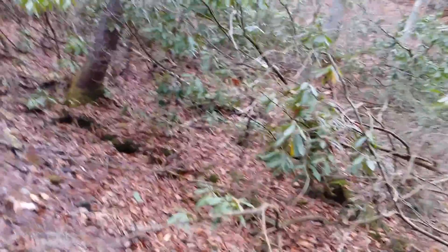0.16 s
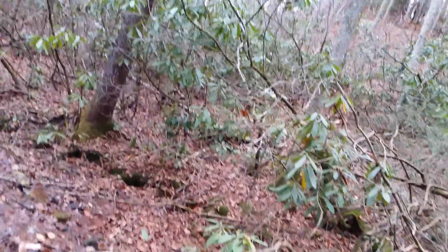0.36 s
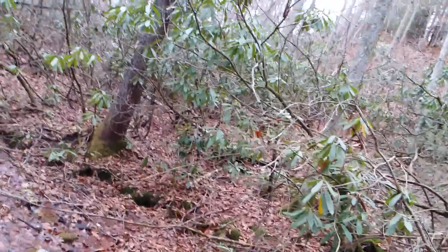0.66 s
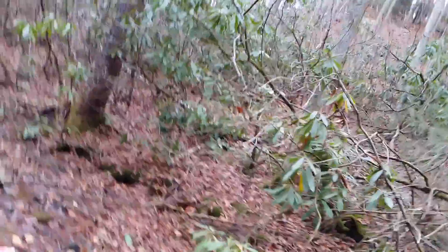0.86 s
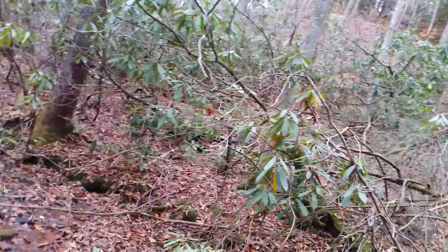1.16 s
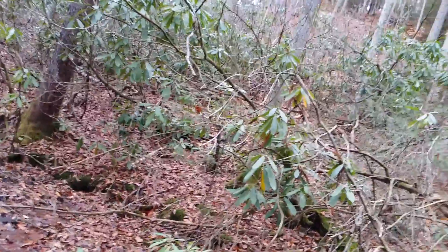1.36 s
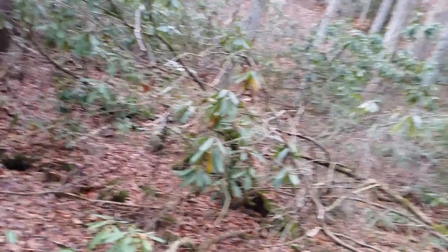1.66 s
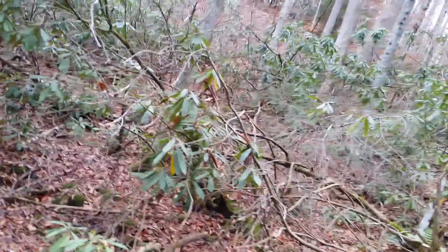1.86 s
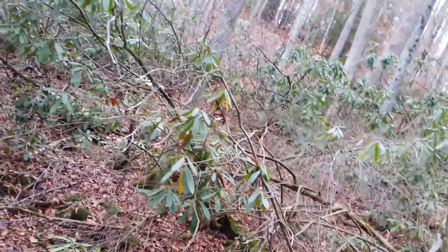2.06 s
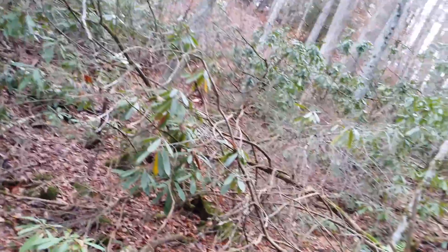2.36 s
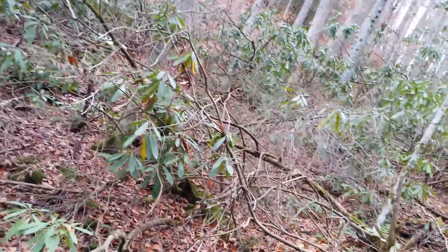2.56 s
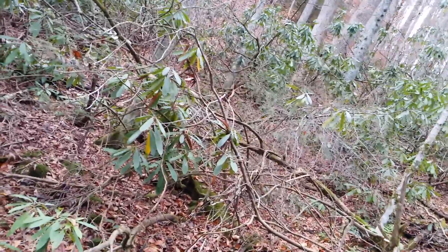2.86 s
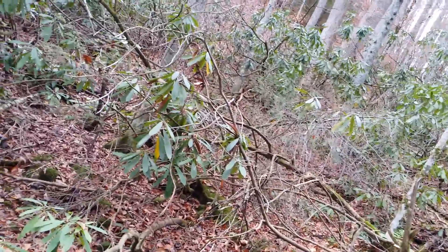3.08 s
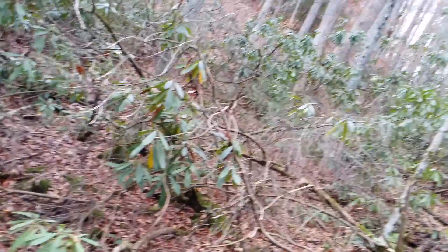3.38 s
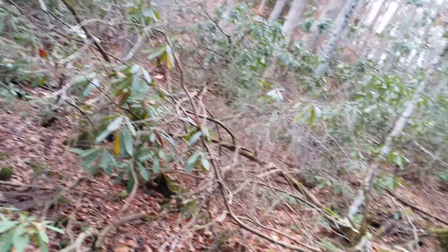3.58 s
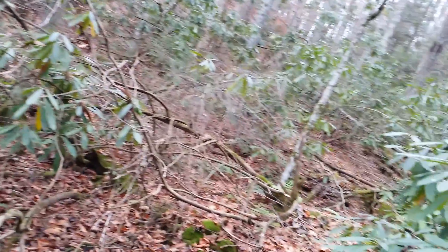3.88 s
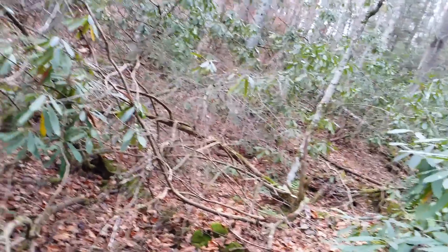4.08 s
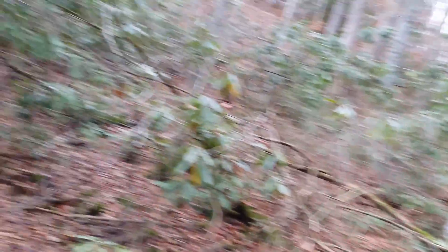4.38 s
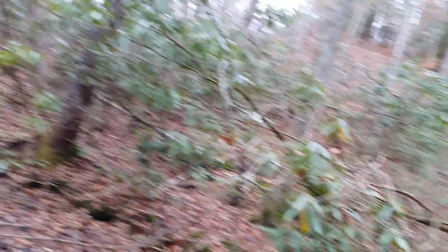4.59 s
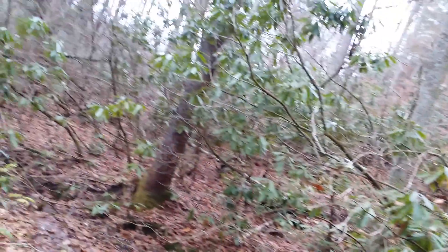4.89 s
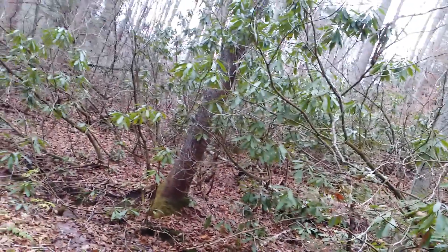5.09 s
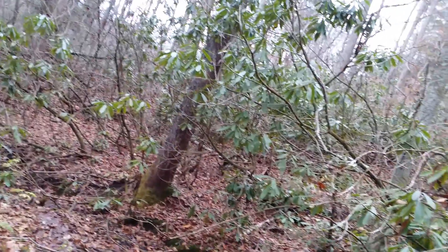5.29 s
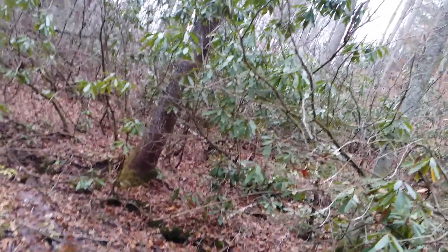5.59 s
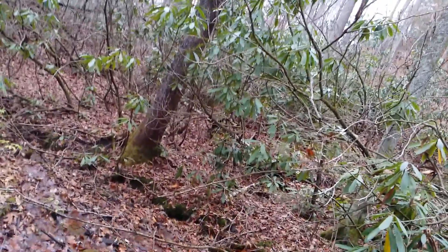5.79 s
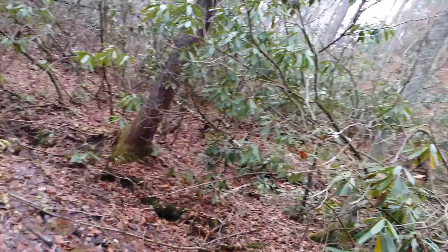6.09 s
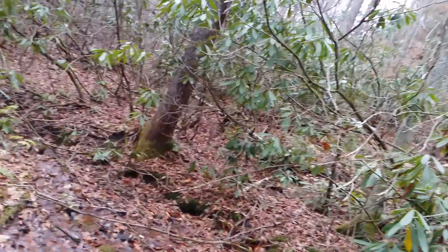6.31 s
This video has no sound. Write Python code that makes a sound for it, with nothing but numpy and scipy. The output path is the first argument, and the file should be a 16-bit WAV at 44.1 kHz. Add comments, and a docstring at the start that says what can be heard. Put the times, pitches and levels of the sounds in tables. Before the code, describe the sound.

Someone treads through dry leaves and dead branches in a forest. A loud cluster of cracks opens, followed by crunching and scattered twig snaps. The movement quiets, one hard crack stands alone, then a last group of sharp breaks comes with renewed rustling. The hand-held stereo microphone is close, adding low rumble and faint steady hiss; each snap leaves a short woody wash from the trees.

```python
"""Someone picks a way over a forest floor: leaves crunch under each press of a foot, and twigs and sticks snap.
A cluster of snaps opens the scene, more follow until 2.4 s, a lone loud one comes at 3.3 s and a last group after 4.7 s.
Each snap is a brittle fracture coloured by the stick's bending modes, then scattered by the litter and nearby trunks.
Low noise rumbles and leaves rustle as the walker moves the hand-held microphone, most in the first second and
after 5.5 s; small stalks tick, footfalls thud softly, and a faint steady noise is the microphone's hiss."""
import sys
import numpy as np
from scipy import signal
from scipy.fft import rfft, irfft, next_fast_len
from scipy.io import wavfile
from scipy.ndimage import uniform_filter1d, map_coordinates

SR = 44100
rng = np.random.default_rng(int(sys.argv[2]) if len(sys.argv) > 2 else 0)


def log_audio(samples):
    """Write samples as a 16-bit WAV file to the path given in sys.argv[1]."""
    # one column per channel
    frames = np.atleast_2d(samples).T
    # limit to full scale, then quantise
    limited = np.clip(frames, -1, 1)
    pcm = np.round(limited * 32767).astype(np.int16)
    wavfile.write(sys.argv[1], SR, pcm)


N = 284451

# spectrum of the hiss: frequency_hz, relative_density_db
HISS_SPECTRUM = [(290, -18), (500, -1), (750, -3.5), (1200, -7.5), (2000, -10), (3500, -9), (5400, -12.5),
                 (6600, 1.5), (7500, 2), (9500, -5.5), (12300, -13), (15000, -10.5), (16000, -12.5)]
# likeness of the hiss in the two ears: frequency_hz, coherence
HISS_COHERENCE = [(300, 0.041), (650, 0.077), (1400, 0)]
# stereo balance of the hiss: frequency_hz, left_over_right_db
HISS_BALANCE = [(1500, -1), (4400, 2.5), (6000, 7), (8000, 10), (11000, 7), (15000, 3)]

# three humps of the rumble, from the lowest up: frequency_hz, relative_density_db
DEEP_SPECTRUM = [(20, -50), (35, -30), (50, -5.5), (75, -2.5), (95, 8), (125, -23), (200, -68)]
BOOM_SPECTRUM = [(60, -50), (90, -14), (120, 2), (160, 1.5), (200, -3), (250, -13), (400, -50.5)]
HOLLOW_SPECTRUM = [(140, -50), (220, 5), (265, -6.5), (315, 5), (370, -7), (460, -10), (600, -23),
                   (1000, -29), (2000, -67)]
# how briskly the walker moves, as a rumble level against STILL_DB: time_s, level_db
MOTION_LEVEL = [(0.0, -48), (0.34, -41), (0.54, -44.5), (0.74, -45.5), (1.0, -55.5), (2.57, -60),
                (3.38, -53.5), (3.56, -51.5), (3.77, -56.5), (4.29, -55.5), (4.69, -54.5), (4.99, -52.5),
                (5.59, -42.5), (5.8, -44.5), (6.0, -46.5), (6.45, -48)]
STILL_DB = -58  # the level when the walker stands almost still
# the upper hump, before a small common lift: time_s, level_db
HOLLOW_LEVEL_CURVE = [(0.0, -58.5), (0.49, -50), (2.3, -62), (2.86, -63), (3.25, -59), (4.46, -58),
                      (4.71, -53), (5.15, -55.5), (5.5, -49.5), (5.87, -54.5), (6.2, -48.5), (6.45, -52)]
# extra surges of the lowest hump: centre_s, level_db
DEEP_SURGES = [(.78, -51), (4.6, -59), (5.04, -48), (5.2, -55), (5.53, -52), (6.39, -56)]
SURGE_S = 0.089  # from the centre of a surge to 1/e of its peak

# soft footfalls and dull knocks of wood, level before the onset is shaped: start_s, level_db, pitch_hz, t60_s
FOOTFALLS = [(.024, -16, 340, 0.015), (.747, -50, 73.6, .29), (5.03, -52, 70.6, .15),
             (5.471, -29.5, 647, 0.02), (5.789, -37, 152, 0.14)]

# a foot presses or brushes the leaves, crispness before a common cut:
# start_s, hold_s, crush_level_db, crisp_over_crush_db
FOOT_PRESSES = [(0, 0.018, -42, 8.5), (0.068, 0.058, -47.5, 1.5), (0.178, 0.031, -47, 4),
                (0.38, 0.23, -55, 1.5), (0.709, 0.014, -41.5, 12), (0.803, 0.36, -50.5, 4),
                (1.21, 0.15, -50, 6.5), (1.672, 0.038, -49, 6.5), (1.792, 0.036, -48.5, 10.5),
                (1.894, 0.1, -56.5, 6), (2.22, 0.14, -62.5, -11), (2.743, 0.065, -69, 10.5),
                (3.41, 0.17, -63, 3), (5.645, .06, -61.5, -7), (6.018, 0.07, -46.5, -0.5),
                (6.15, 0.25, -54, 4)]
ATTACK_S, RELEASE_S = 0.023, 0.04  # the crunch grows and dies by a factor e in these times
# spectra of the dull crunch and the crisp crackle: frequency_hz, relative_density_db
CRUSH_SPECTRUM = [(150, -18), (350, -5), (700, 2.5), (1300, 0.5), (2200, -4), (3200, -4), (5000, -1.5),
                  (9000, -30)]
CRISP_SPECTRUM = [(1200, -11), (2500, 2.5), (3600, -2.5), (4700, 4), (6000, 3), (7800, -0.5), (10000, -1.5),
                  (13000, -6.5), (16000, -4.5)]
# likeness of the leaves in the two ears: frequency_hz, coherence
LEAF_COHERENCE = [(300, 0.27), (650, 0.56), (1400, 0.026), (3000, -0.089), (7000, -0.047)]
# stalks that tick clearly, level before a common lift: start_s, level_db, pitch_hz
STALK_TICKS = [(.621, -46, 1027), (.766, -43, 1530), (0.809, -38, 4000), (1.324, -29.5, 4680),
               (2.004, -43, 3880), (2.574, -51, 3000), (2.623, -46, 4650), (2.731, -47, 5250),
               (2.983, -54, 2950), (3.125, -49, 2320), (3.222, -52, 2770), (3.428, -48, 2440),
               (3.495, -49.5, 1240), (3.57, -48, 3960), (4.427, -49, 4370), (5.532, -45.5, 1760),
               (6.108, -30.5, 4820), (6.355, -38, 4230)]

# breaking twigs, except the row at 5.4204, a strong quick return of the snap just before it off nearby litter
# and trunks: start_s, level_db, brightness_db_per_octave, lowest_bending_mode_hz, ring_db, tearing (0 to 1),
# left_over_right_db
STICK_SNAPS = [(0.023, -3, -5.5, 5330, 16, 0.54, 1), (.0636, -23, 4, 3500, 4, 0.2, -1),
               (0.0742, -13.5, -2.5, 7700, 11.5, 1, -3), (.111, -7, -0.5, 4320, 2.5, .86, 6),
               (.118, -15.5, -2, 800, 8, 0.85, -2), (0.9249, -19, -2.2, 1780, 11, 0.7, 5),
               (.993, -12, -2, 487, 7, 0.38, 0), (1.1179, -15, -5.5, 5640, 19.5, 0.6, 5),
               (1.2434, -24, -4.5, 1360, 20, 0, 2), (1.4428, -0.5, -0.9, 2800, 14, .26, 1.5),
               (1.7041, -22, -3, 3400, 17.5, 0.64, 0), (1.7848, -11.5, -1.1, 1490, 8.5, 0.34, 2),
               (1.8101, -16.5, -4, 2220, 20.5, 0.64, 3), (1.8647, -16, -2, 2410, 19, 0.68, 2),
               (1.871, -22, -2.5, 2420, 21.5, 0.1, 7), (1.919, -25.5, -3, 3800, 22, 0.95, 5),
               (1.9536, -13, 1.5, 1090, 14, 0.3, 4), (2.205, -19.5, -3, 830, 8, 0.25, 1),
               (2.4242, -16, -3.5, 745, 13.5, 0.33, 4), (3.2973, 2.5, 0.8, 980, 3, 0.49, 8),
               (4.7078, -26, -3, 1550, 15, .5, 3), (4.7725, -22, -3, 1550, 14.5, .16, 1.5),
               (5.0827, -30, -5.5, 433, 9.5, 0.33, 0), (5.4173, -1, -0.5, 1360, 8.5, 0.04, 5),
               (5.4204, -7, 2.5, 990, 4.5, 0.77, -9), (5.4707, -2, -0.8, 590, -0.5, 0.68, 1.5),
               (5.837, -15.5, -1.8, 1330, 11, 0.5, 5)]
# bending modes of a stick: multiple_of_lowest_mode, share_of_ring
BENDING_MODES = [(1, 1), (2.76, 0.7), (5.4, 0.49)]
MODE_OCTAVES = 0.54  # Gaussian width of a mode: dead wood is heavily damped
TRAVEL_S = .0005  # time that a bending wave of 1 kHz takes along a stick
# colour that all sticks share: frequency_hz, gain_db
WOOD_COLOUR = [(60, -26), (200, -5.5), (350, 0.5), (800, 2.5), (2000, -2), (5000, 0), (7600, -1),
               (10500, -1), (15000, -3)]
# where the snaps lie as the microphone turns: time_s, left_ear_lead_ms
SNAP_BEARING = [(0, 0.23), (1.2, 0.2), (1.44, 0.04), (1.7, 0.26), (3.3, 0.18), (4.7, -0.29), (5.42, -0.055),
                (5.5, 0.1)]
# early decay of the forest's wash: frequency_hz, t60_s
FOREST_DECAY = [(300, 0.063), (2000, 0.069), (8000, .15), (16000, 0.16)]
# colour of the wash: frequency_hz, gain_db
SCATTER_COLOUR = [(200, 4), (1000, 2), (3000, 1.5), (6000, 1), (12000, 0.5)]

# the microphone's colour, on leaves, ticks and snaps: frequency_hz, gain_db
MICROPHONE_COLOUR = [(400, 3.5), (750, -1.5), (1400, 1), (1900, 0), (2500, -1), (3300, -0.5), (4700, -4),
                     (5900, -3), (7600, 4), (9800, 0.5), (13000, 1), (15500, -2.5)]
TOP_HZ = 15800  # band limit


def amp(db):
    """Logarithmic level: 20 dB is a tenfold amplitude."""
    return 10 ** (np.asarray(db) / 20)


def unit(x):
    """Normalisation to a root-mean-square of 1."""
    return x / np.sqrt(np.mean(x ** 2) + 1e-20)


def along(points, hz):
    """Linear interpolation of (frequency, value) points on a logarithmic frequency axis."""
    point_hz, values = np.transpose(points)
    return np.interp(np.log(hz + 1), np.log(point_hz), values)


def curve(rows):
    """Linear interpolation of (time, value) rows at every sample."""
    times, values = np.transpose(rows)
    return np.interp(np.arange(N) / SR, times, values)


def wobble(rate):
    """Random modulation: a smooth curve through `rate` random knots a second."""
    knots = rng.standard_normal(int(N * rate / SR) + 4)
    return map_coordinates(knots, [np.arange(N) * rate / SR])


def filtered(x, response):
    """Linear filtering: the spectrum times a response of frequency."""
    length = x.shape[-1]
    padded = next_fast_len(length + 8192)
    spectrum = rfft(x, padded) * response(np.fft.rfftfreq(padded, 1 / SR))
    return irfft(spectrum, padded)[..., :length]


def panned(left_over_right_db):
    """Interaural level difference: left and right gains of mean power 1."""
    gains = amp(np.array([[.5], [-.5]]) * left_over_right_db)
    return gains / np.sqrt(np.mean(gains ** 2, axis=0))


def spread(pair, spectrum, coherence):
    """Interaural coherence: two unrelated signals, coloured and blended as mid and side, give stereo of rms 1."""
    def mid_side_gains(hz):
        angle = np.arccos(np.clip(along(coherence, hz), -1, 1)) / 2
        return amp(along(spectrum, hz)) * [np.cos(angle), np.sin(angle)]

    mid, side = filtered(pair, mid_side_gains)
    return unit(np.array([mid + side, mid - side]))


def add(track, start_s, sound):
    """Superposition: mix a sound into the track from its start time."""
    i = max(0, round(start_s * SR))
    track[:, i:i + sound.shape[-1]] += sound[..., :N - i]


def patchy(depth_db, size):
    """Fluctuating noise: pitch bands swell and fade apart; a small window gives quick, wide patches."""
    noise = signal.stft(rng.standard_normal((2, N)), nperseg=size)[2]
    field = rng.standard_normal(noise.shape[1:])
    for axis in (0, 1):
        field = uniform_filter1d(field, size=3, axis=axis)
    patches = noise * amp(depth_db * unit(field))
    return unit(signal.istft(patches, nperseg=size)[1][:, :N])


def air():
    """Stationary noise: a steady hiss whose treble leans to the left."""
    hiss = spread(rng.standard_normal((2, N)), HISS_SPECTRUM, HISS_COHERENCE)
    return amp(-58.5) * filtered(hiss, lambda hz: panned(along(HISS_BALANCE, hz)))


def motion():
    """Motion as a control signal: its level above standing still, in dB."""
    return curve(MOTION_LEVEL) - STILL_DB


def rumble(deep_db=-69, deep_follow=0.89, boom_db=-54.5, hollow_db=1):
    """Band-shaped noise: three humps, almost alike in both ears; the lower two follow the movement."""
    def hump(spectrum, coherence):
        return spread(patchy(depth_db=1.7, size=4096), spectrum, [(100, coherence)])

    t = np.arange(N) / SR
    moving_db = motion()
    deep = amp(deep_db + deep_follow * moving_db)
    for centre_s, db in DEEP_SURGES:
        deep = deep + amp(db) * np.exp(-((t - centre_s) / SURGE_S) ** 2)
    boom = amp(boom_db + moving_db)
    hollow = amp(hollow_db + curve(HOLLOW_LEVEL_CURVE))
    return deep * hump(DEEP_SPECTRUM, 0.88) + boom * hump(BOOM_SPECTRUM, 0.97) + hollow * hump(HOLLOW_SPECTRUM, 0.9)


def thuds():
    """Damped oscillation: the foot's weight gives the soil or a buried branch a short, low push."""
    out = np.zeros((2, N))
    t = np.arange(SR // 3) / SR
    for start_s, db, hz, t60 in FOOTFALLS:
        onset = (1 - np.exp(-2 * hz * t)) ** 2
        add(out, start_s, 2 * amp(db - 60 * t / t60) * np.sin(2 * np.pi * hz * t) * onset)
    return out


def leaf_levels(rest_crush_db=-70.0, rest_crisp_db=-61.0, follow=0.41):
    """Addition of powers: each press swells, holds and dies over a rustle that follows the movement."""
    t = np.arange(N) / SR
    stir_db = follow * motion()
    crush_power = amp(rest_crush_db + stir_db) ** 2
    crisp_power = amp(rest_crisp_db + stir_db) ** 2
    for start_s, hold_s, db, crispness_db in FOOT_PRESSES:
        growth = (t - start_s) / ATTACK_S
        decay = (start_s + hold_s - t) / RELEASE_S
        press = np.exp(np.minimum(0, np.minimum(growth, decay)))
        crush_power = crush_power + (amp(db) * press) ** 2
        crisp_power = crisp_power + (amp(db + crispness_db) * press) ** 2
    return 10 * np.log10(crush_power), 10 * np.log10(crisp_power)


def crackle(rate, size_db, rub):
    """Random impulses: `rate` leaf fractures a second, of uneven size, over the patchy noise of rubbing."""
    sizes = amp(size_db * np.minimum(rng.exponential(size=(2, N)), 4))
    struck = rng.random((2, N)) < rate / SR
    breaks = struck * sizes * rng.choice([-1, 1], (2, N))
    return unit(breaks) + rub * patchy(depth_db=2.8, size=256)


def leaves(crush_db, crisp_db):
    """Crackling noise: crushed litter crunches dully, its brittle edges crackle; both come in clumps."""
    clumps_db = 1.2 * wobble(70)
    crush = spread(crackle(rate=900, size_db=3.5, rub=1.3), CRUSH_SPECTRUM, LEAF_COHERENCE)
    crisp = spread(crackle(rate=3000, size_db=3.3, rub=1.4), CRISP_SPECTRUM, LEAF_COHERENCE)
    return panned(1.95) * (amp(crush_db + clumps_db) * crush + amp(crisp_db + clumps_db - 3.0) * crisp)


def tick(hz, cycles):
    """Damped resonance with phase noise: a small stiff bit flicks and scrapes, falling 60 dB in `cycles`."""
    t = np.arange(SR // 40) / SR
    drift = np.cumsum(rng.standard_normal((2, len(t))), axis=1) * np.sqrt(hz / SR) * 0.98
    ring = np.sin(2 * np.pi * hz * t + rng.uniform(0, 2 * np.pi) + drift)
    scrape = 0.16 * rng.standard_normal((2, len(t))) * amp(-60 * t / .01)
    return (ring + scrape) * amp(-60 * t * hz / cycles) * (1 - np.exp(-t * hz))


def stalk_ticks():
    """Isolated resonances: single stalks tick clearly now and then."""
    out = np.zeros((2, N))
    for start_s, db, hz in STALK_TICKS:
        add(out, start_s, amp(db + 3) * panned(2.2) * tick(hz, cycles=74))
    return out


def loose_flicks(crush_db, scatter_db, loose_db, stray_db, count):
    """Random excitation: the harder the litter is crushed, the louder its loose bits flick; a few stand out."""
    out = np.zeros((2, N))
    starts = rng.integers(N, size=count)
    for i, (size, pitch, side) in zip(starts, rng.standard_normal((count, 3))):
        db = crush_db[i] + loose_db + scatter_db * min(size, 2) + stray_db * (size > 1.6)
        hz = min(2000 * np.exp(.5 * pitch), 8000)
        add(out, i / SR, amp(db) * panned(2 + 4 * side) * tick(hz, cycles=31))
    return out


def causal(log_gain):
    """Minimum phase: the quickest response with this log gain, on the grid of a real FFT."""
    cepstrum = irfft(log_gain)
    half = len(log_gain) - 1
    folded = np.r_[cepstrum[0], 2 * cepstrum[1:half], cepstrum[half], np.zeros(half - 1)]
    return np.exp(rfft(folded))


def stick_colour(stick, hz):
    """Modal colour in dB: wood, tilted by brightness about 2 kHz, with a broad hump at each bending mode."""
    db, brightness, lowest_hz, ring_db = stick
    octaves = np.log2(np.maximum(hz, 200) / 2000)  # the tilt stops below 200 Hz
    modes = 0
    for multiple, share in BENDING_MODES:
        distance = np.log2((hz + 1) / (multiple * lowest_hz))  # octaves
        modes = modes + share * np.exp(-.5 * (distance / MODE_OCTAVES) ** 2)
    return db + along(WOOD_COLOUR, hz) + brightness * octaves + ring_db * modes


def fracture(stick, tear, tear_t60, recoil, recoil_t60):
    """Brittle and fibrous fracture: one click or a tearing of fibres, then a duller rattle as the ends recoil."""
    t = np.arange(2 ** 11) / SR
    hz = np.fft.rfftfreq(len(t), 1 / SR)
    tear = np.clip(tear, .1, 1)
    fibres, ends = rng.standard_normal((2, len(t)))
    fibres *= amp(-60 * t / (tear * tear_t60))  # more tearing also lasts longer
    dulling = signal.butter(2, 2500, fs=SR, output='sos')
    ends = signal.sosfilt(dulling, ends) * amp(-60 * t / recoil_t60)
    click = t == 0
    push = rfft((1 - tear) * click + tear * fibres / np.linalg.norm(fibres) + recoil * ends)
    # dead wood has no clear note: even out the broad chance peaks, then give the stick's own colour
    power = abs(uniform_filter1d(abs(push) ** 2, size=30)) + .02
    return irfft(push * causal(np.log(amp(stick_colour(stick, hz)) / np.sqrt(power))))


def dispersion(hz):
    """Dispersion: bending waves run faster the higher they are, so a crack's treble leaves the stick first."""
    return np.exp(-4j * np.pi * TRAVEL_S * np.sqrt(hz * 1000))


def interaural_delay(lead_ms, hz):
    """Interaural time difference: the farther ear hears the snap later."""
    twice_delay_ms = abs(lead_ms) + np.array([[-1], [1]]) * lead_ms
    return np.exp(-1j * np.pi * hz * twice_delay_ms / 1000)


def forest(stick, wet_db, late_db, late_t60):
    """Diffuse scattering: litter and trunks return a grainy wash; farther trees add a faint longer tail."""
    hz, t, noise = signal.stft(rng.standard_normal((2, SR // 2)), SR, nperseg=128)
    early = amp(-60 * t / along(FOREST_DECAY, hz)[:, None])
    late = amp(late_db - 60 * t / late_t60)
    grain_db = 2 * unit(uniform_filter1d(rng.standard_normal(noise.shape[1:]), size=12, axis=0))
    colour_db = stick_colour(stick, hz) + along(SCATTER_COLOUR, hz)
    wash = noise * (early + late) * amp(colour_db[:, None] + grain_db)
    tail = signal.istft(wash, SR, nperseg=128)[1]
    arrival = np.interp(np.arange(tail.shape[1]) / SR, [.001, .003], [0, 1])  # fades in from 1 to 3 ms
    return amp(wet_db) * tail * arrival


def snaps():
    """Direct and scattered sound: every stick breaks at its own place and is answered by the forest."""
    out = np.zeros((2, N))
    for start_s, *stick, tear, pan_db in STICK_SNAPS:
        burst = fracture(stick, tear, tear_t60=0.032, recoil=0.086, recoil_t60=0.013)
        lead_ms = np.interp(start_s, *np.transpose(SNAP_BEARING))
        direct = filtered(burst, lambda hz: interaural_delay(lead_ms, hz) * dispersion(hz))
        add(out, start_s, panned(pan_db) * direct)
        add(out, start_s, forest(stick, wet_db=-37, late_db=-20.0, late_t60=0.72))
    return out


def scene():
    """Superposition at the microphone: its colour shapes the litter; thuds, rumble and hiss join uncoloured."""
    crush_db, crisp_db = leaf_levels()
    litter = leaves(crush_db, crisp_db) + stalk_ticks() + snaps()
    litter += loose_flicks(crush_db, scatter_db=1, loose_db=0.5, stray_db=12, count=650)
    coloured = filtered(litter, lambda hz: amp(along(MICROPHONE_COLOUR, hz)))
    return air() + rumble() + thuds() + coloured


def record(dry):
    """Saturation and band limiting: peaks round off below full scale, and a steep filter ends the treble."""
    rounded = dry / (1 + (dry / .85) ** 6) ** (1 / 6)
    return filtered(rounded, lambda hz: 1 / np.sqrt(1 + (hz / TOP_HZ) ** 120))


dry = scene()
out = record(dry)
log_audio(out)
```